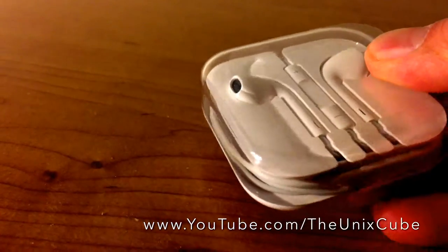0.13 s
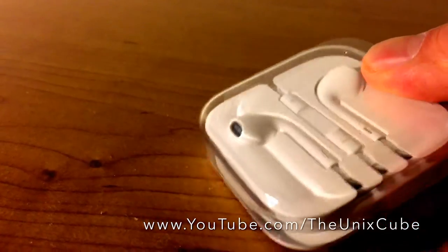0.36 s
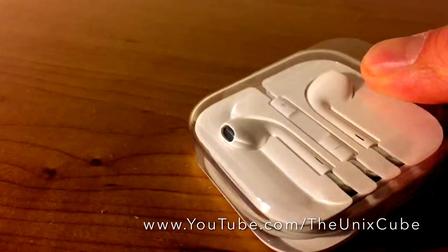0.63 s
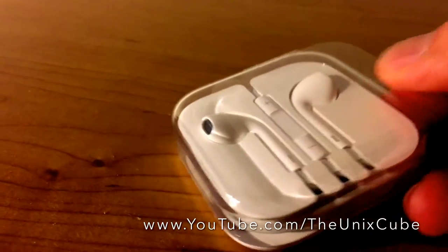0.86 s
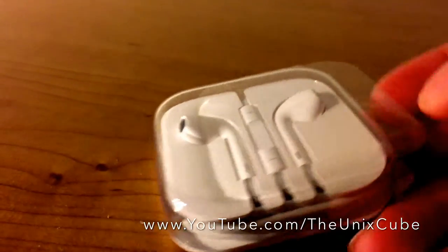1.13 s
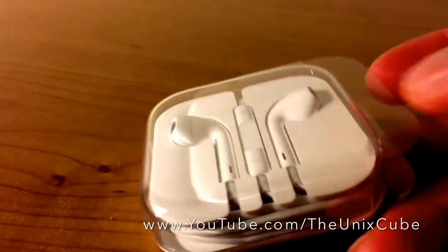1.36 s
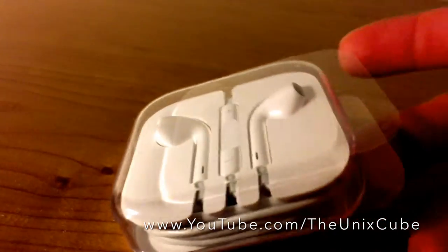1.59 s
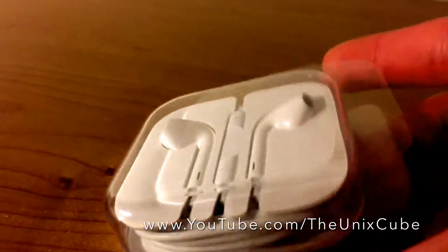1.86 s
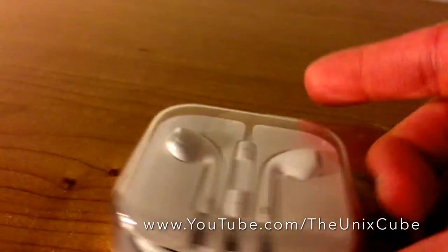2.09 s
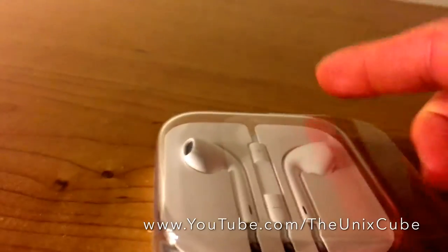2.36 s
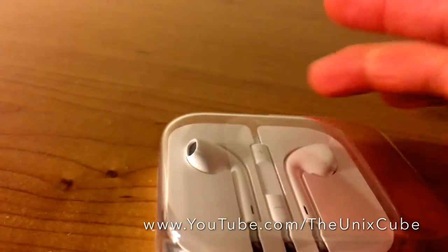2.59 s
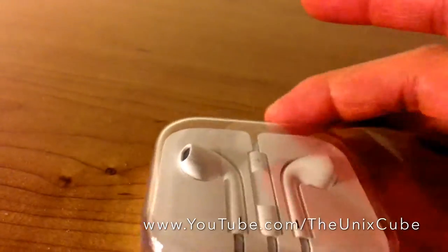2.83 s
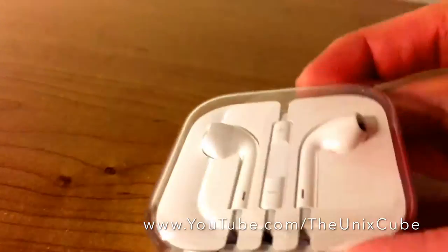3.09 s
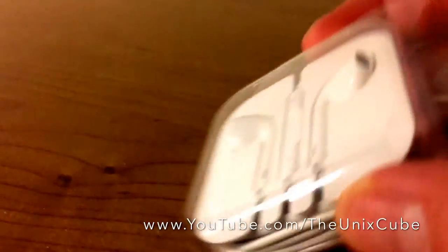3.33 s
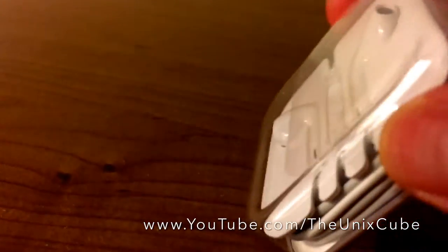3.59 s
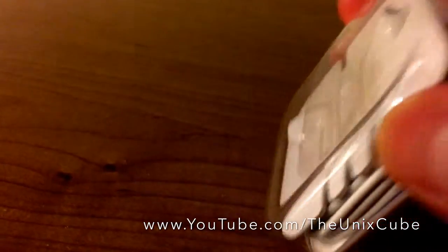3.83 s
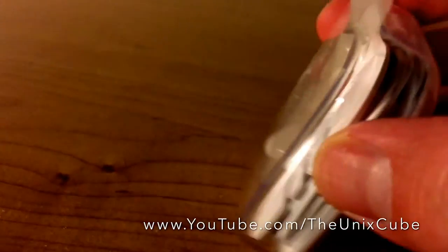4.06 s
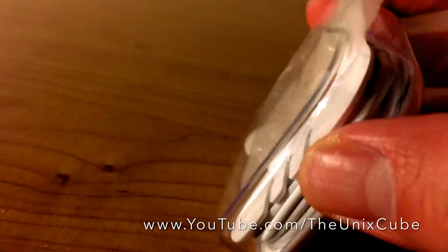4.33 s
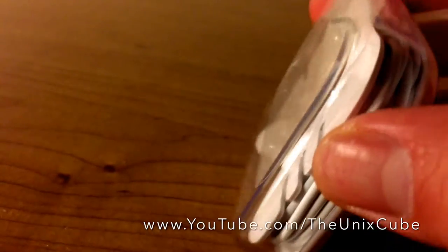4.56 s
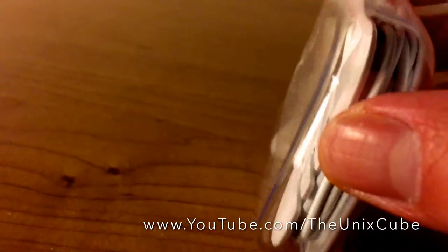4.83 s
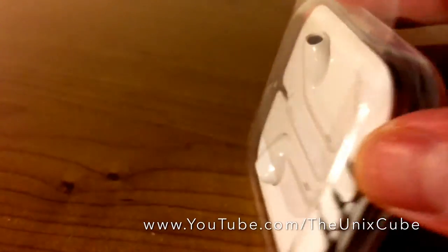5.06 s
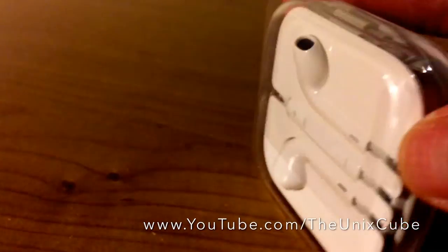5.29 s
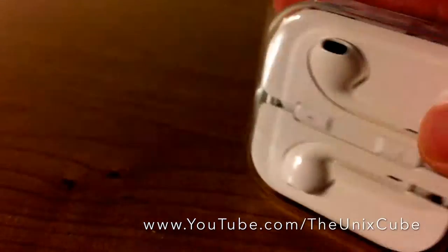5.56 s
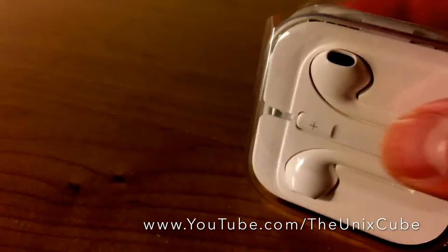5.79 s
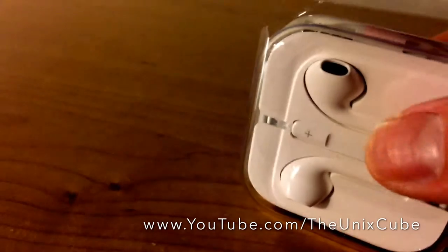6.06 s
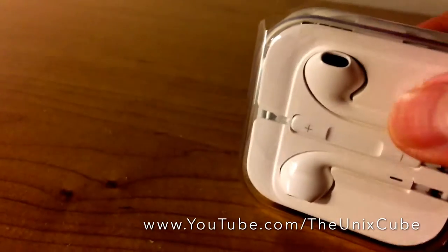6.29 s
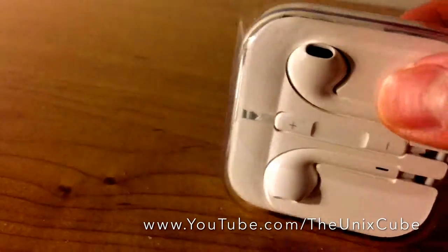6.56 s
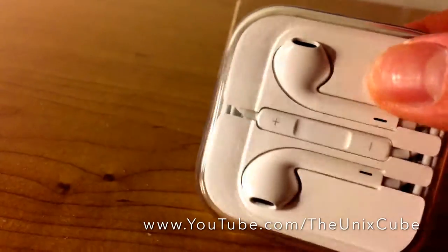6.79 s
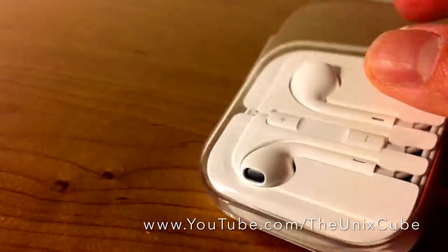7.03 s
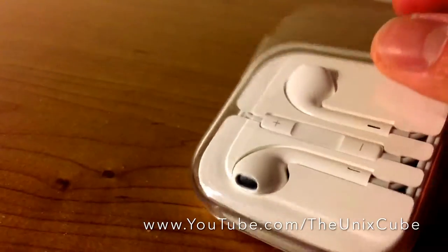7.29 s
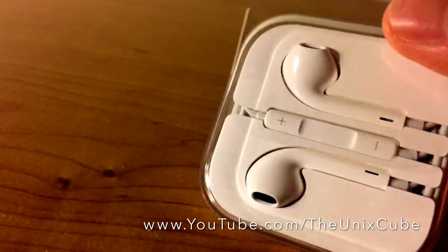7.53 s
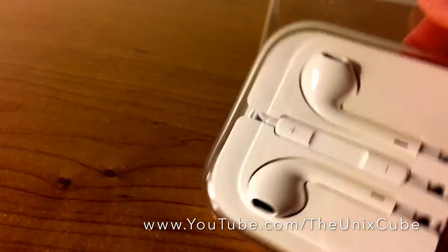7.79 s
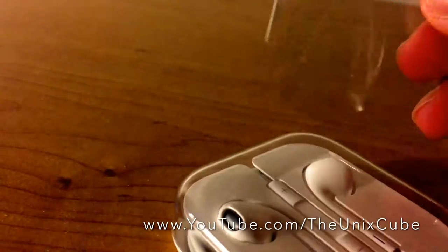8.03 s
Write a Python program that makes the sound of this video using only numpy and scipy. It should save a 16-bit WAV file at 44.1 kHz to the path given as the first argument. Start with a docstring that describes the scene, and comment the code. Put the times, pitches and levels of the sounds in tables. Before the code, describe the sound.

Close to a small microphone in a small quiet room, a hard plastic case is turned and tapped over a wooden table. A sharp knock comes early, then soft rubs, then strong isolated clacks around two, four and five seconds. Light ticks and shuffling follow, and a loud clack ends it. Faint low hum and hiss lie underneath.

```python
"""A hard plastic case is turned, tapped, set down and pried at on a wooden table, close to a small microphone.
Each contact is a noise crack plus damped shell, lid and table modes; a small room answers the knocks.
Fingers and a thin film slide, a fingernail scrapes and the case drags: noise that slips unevenly,
through spectra and resonances. A low hum and hiss, both shaped noise, waver slightly underneath."""
import sys
import numpy as np
from scipy import signal
from scipy.fft import rfft, irfft, next_fast_len
from scipy.io import wavfile
from scipy.ndimage import map_coordinates

SR = 44100
rng = np.random.default_rng(int(sys.argv[2]) if len(sys.argv) > 2 else 0)


def magnitude_from_level(level_db):
    """Linear magnitude for a level in decibels (20 dB per decade)."""
    exponent = np.asarray(level_db, float) / 20
    return 10 ** exponent


def transcribe(u):
    """Save the signal u as a 16-bit wav file named by the first command-line argument.

    u: samples, shape (n,) or (channels, n), limited to [-1, 1]; the rate is SR.
    q: integer samples, one column per channel.
    """
    v = np.clip(np.atleast_2d(u).T, -1, 1)
    q = np.round(v * 32767).astype(np.int16)
    wavfile.write(sys.argv[1], SR, q)


N = 359415


def unit(x):
    """Scales to rms 1."""
    return x / np.sqrt(np.mean(x ** 2) + 1e-20)


def along(points, hz):
    """Interpolates (f/Hz, value) points on a log frequency axis."""
    f, v = np.transpose(points)
    return np.interp(np.log(hz + 1), np.log(f + 1), v)


def filtered(x, response):
    """Multiplies the spectrum of x by a response of frequency."""
    m = next_fast_len(len(x) + 8192)
    hz = np.fft.rfftfreq(m, 1 / SR)
    return irfft(rfft(x, m) * response(hz), m)[:len(x)]


def coloured(x, spectrum):
    """Filters x by an (f/Hz, level/dB) spectrum."""
    return filtered(x, lambda hz: magnitude_from_level(along(spectrum, hz)))


def resonant(x, peaks):
    """Passes x twice through parallel resonances of alternating sign, for steep flanks."""
    def response(f):
        total = 0
        for k, (centre, width, db) in enumerate(peaks):
            damping = 1j * f * width
            total = total + (-1) ** k * magnitude_from_level(db) * damping / (centre ** 2 - f ** 2 + damping)
        return total ** 2
    return filtered(x, response)


def wobble(rate_hz):
    """Smooth random curve, rate_hz knots a second."""
    knots = rng.standard_normal(int(N * rate_hz / SR) + 4)
    return map_coordinates(knots, [np.arange(N) * rate_hz / SR])


def gritty(grit_db, slips_hz):
    """Noise whose strength varies unevenly as the skin sticks and slips."""
    return unit(rng.standard_normal(N) * magnitude_from_level(grit_db * wobble(slips_hz)))


def strokes(rows):
    """Strength of the strokes and of what each shakes besides: quick catch, even drift in dB, quick lift."""
    catch_db_per_s, lift_db_per_s = 899.5, 798.5
    t = np.arange(0, N / SR + .002, .001)
    start, length, first_db, last_db, other_db = np.transpose(rows)[:, :, None]
    drift_db = first_db + (last_db - first_db) * np.clip((t - start) / length, 0, 1)
    catch_db = catch_db_per_s * np.maximum(start - t, 0)
    lift_db = lift_db_per_s * np.maximum(t - start - length, 0)
    power = magnitude_from_level(2 * (drift_db - catch_db - lift_db))
    time = np.arange(N) / SR
    main = np.interp(time, t, np.sqrt(np.sum(power, axis=0)))
    other = np.interp(time, t, np.sqrt(np.sum(power * magnitude_from_level(2 * other_db), axis=0)))
    return main, other


# hum and hiss spectrum: f/Hz, relative density/dB
HUM_HISS_SPECTRUM = [(13, -53), (22, -25.5), (53, -0.5), (144, -9), (195, -21), (265, -13), (436, -23.5),
                     (660, -23), (757, -23.5), (2350, -30.5), (13800, -38), (16300, -40.5)]


def background():
    """Low hum and hiss as one shaped noise, its level wavering a little."""
    level_db = -66 + 0.52 * wobble(rate_hz=0.87)
    return magnitude_from_level(level_db) * unit(coloured(rng.standard_normal(N), HUM_HISS_SPECTRUM))


# skin and film on the shell: start t/s, length t/s, hiss level at start/dB, at end/dB, rim level re hiss/dB
SLIDE_STROKES = [(.4, 0.093, -76.5, -70, -2), (.525, 0.012, -64, -54, -17), (.715, 0.029, -66, -61, -14),
                 (.85, 0.135, -75, -71, -13), (1.17, 0.11, -76, -73, -4), (1.965, 0.059, -67, -48.5, -5),
                 (2.03, 0.36, -66.5, -64, -11), (2.31, 0.056, -64.5, -56.5, -4.5),
                 (2.38, 0.062, -64.5, -68, -12), (2.47, 0.073, -73.5, -68, 0), (2.6, 0.046, -64, -56, 1),
                 (2.66, 0.059, -68, -78.5, -2.5), (2.8, .07, -73, -68.5, -2), (3., 0.18, -71.5, -73.5, -3),
                 (3.31, 0.041, -76, -72, 1.5), (3.64, 0.063, -77.5, -73.5, -7),
                 (3.81, 0.026, -80.5, -78.5, -6), (3.985, 0.013, -52, -56.5, 5.5), (4., 0.35, -69, -66, -5),
                 (4.14, 0.058, -68, -63.5, 11.5), (5.27, 0.038, -69.5, -50, -2.5),
                 (5.42, 0.083, -81, -69, -3.5), (5.52, 0.283, -65.5, -69, -2), (6.42, .05, -77.5, -75, -3),
                 (6.57, 0.11, -77, -49, -10.5), (6.71, 0.12, -80, -75.5, 4), (7.08, 0.033, -78, -80, -5),
                 (7.31, 0.0089, -71, -71.5, -19), (7.55, 0.045, -69, -60.5, -1),
                 (7.62, 0.062, -76.5, -64.5, 1), (7.72, .12, -74, -71.5, 0), (7.85, 0.15, -66, -52, 3),
                 (8.03, .12, -39.5, -67, 5.5)]
# hiss spectrum: f/Hz, relative density/dB
SKIN_SPECTRUM = [(1180, -26), (2000, -1), (2960, -7.5), (3550, -1.5), (4010, -5), (8050, -7), (10800, -8.5),
                 (14500, -8.5), (16000, -25)]


def sliding():
    """Skin and film slip over the shell as gritty hiss; also returns how hard they shake the rim."""
    hiss, rim = strokes(SLIDE_STROKES)
    return hiss * unit(coloured(gritty(grit_db=1.5, slips_hz=150), SKIN_SPECTRUM)), rim


# how freely the fingers let the lid ring: t/s, lid level re table/dB (before knock trims)
LID_FREEDOM = [(0, -3), (.7, 2.5), (1.3, 8), (1.6, 2), (2., 3), (2.35, -12), (3., 3.5), (3.4, -4.5),
               (3.95, 3.5), (4.3, -6), (5.06, 4.5), (5.3, -7), (5.5, -1), (5.65, -12.5), (6.7, -9.5),
               (7.5, -14.5), (7.72, 1.5), (7.9, -6.5), (8.15, 4.5)]


def lid_db(s):
    """Lid level re table at time s, as the grip changes."""
    return np.interp(s, *np.transpose(LID_FREEDOM))


# case dragging and rocking: start t/s, length t/s, shell level at start/dB, at end/dB, table level re shell/dB
DRAG_STROKES = [(.44, 0.027, -76, -71, -11), (.51, 0.025, -69, -66, 9.5), (.73, 0.058, -74, -52.5, -1),
                (.82, 0.051, -66, -77, 5.5), (.91, 0.062, -75, -72.5, 1), (1.03, 0.076, -85, -77.5, 4),
                (1.17, .05, -68, -79, -5), (1.225, 0.079, -59, -60.5, -3.5), (1.46, .1, -78.5, -65, 6),
                (1.965, 0.048, -70, -35, -2.5), (2.03, .12, -52.5, -80.5, 16.5),
                (2.15, 0.29, -65, -77.5, 5), (2.32, 0.064, -71.5, -68.5, 10),
                (2.5, 0.044, -69.5, -66, -11.5), (2.6, 0.048, -62, -56, -1.5),
                (2.82, 0.061, -76.5, -69, -2.2), (3.02, .12, -72, -70.5, 3.5), (3.31, 0.046, -69, -66.5, 3),
                (3.66, 0.044, -78.5, -75, -2), (3.79, 0.04, -73, -72, -11.5),
                (3.93, .014, -52.5, -40.5, -4.5), (3.97, 0.13, -55, -71, 11.5), (4.1, 0.08, -62, -54, 3.2),
                (4.2, 0.18, -75.5, -73, 9), (5.08, 0.12, -46, -75.5, 8.5), (5.22, .1, -63.5, -55.5, -5),
                (5.32, 0.037, -48.5, -60.5, 7.5), (5.42, 0.078, -72, -67.5, 5.5),
                (5.52, 0.046, -53.5, -62, 7.5), (5.58, 0.19, -56, -60, -1.5), (5.75, 0.055, -60, -63, 3.5),
                (6.33, 0.062, -74.5, -63.5, -1), (6.43, 0.12, -62, -64, -2.5), (6.57, 0.14, -62, -41, -8),
                (6.71, 0.058, -51.5, -60.5, 9.5), (6.78, 0.0383, -65.5, -53.5, -3),
                (6.93, 0.034, -82, -74.5, 11.5), (7.05, .07, -74.5, -70.5, -6),
                (7.38, 0.09, -76.5, -72.5, 9.5), (7.56, .04, -71, -63.5, -7.5),
                (7.6, 0.016, -74.5, -78.5, 14.5), (7.67, .035, -81, -72.5, 11.5),
                (7.72, 0.11, -60, -82.5, 11.5), (7.85, 0.079, -67, -46.5, 7.5),
                (7.93, 0.065, -52.5, -35.5, -1.5), (8.03, .12, -26, -57.5, -2.2)]
# rubbed shell, its air cavity: f/Hz, width per pass/Hz, level per pass/dB
CAVITY_PEAKS = [(1010, 180, -.5)]
# rubbed rim: f/Hz, width per pass/Hz, level per pass/dB
RIM_PEAKS = [(1500, 310, 2.5), (2040, 260, -5.5)]
# rubbed table: f/Hz, width per pass/Hz, level per pass/dB
WOOD_PEAKS = [(144, 150, -3.5), (263, 410, -3), (384, 110, -3)]


def dragging(rubbed_rim):
    """One stick-slip force drives shell, rim and lid; separate, slower slips drive the table."""
    shell, table = strokes(DRAG_STROKES)
    rim = np.hypot(rubbed_rim, magnitude_from_level(-11.5) * shell)  # a drag shakes the rim too
    lid = table * magnitude_from_level(lid_db(np.arange(N) / SR))
    slips = gritty(grit_db=2.5, slips_hz=120)
    table_slips = gritty(grit_db=2.0, slips_hz=57)
    return (shell * unit(resonant(slips, CAVITY_PEAKS))
            + rim * unit(resonant(slips, RIM_PEAKS))
            + lid * unit(resonant(slips, [(564, 87, 0)]))
            + table * unit(resonant(table_slips, WOOD_PEAKS)))


def rings(t, modes, chance, attack_s):
    """Damped modes that swell over the contact time, each at a slightly new strength."""
    total = 0
    for (hz, db, t60), c in zip(modes, chance):
        total = total + magnitude_from_level(db + 1.5 * c - 60 * t / t60) * np.sin(2 * np.pi * hz * t)
    return (1 - np.exp(-t / attack_s)) ** 2 * total


# contacts, before trims: t/s, shell level/dB, table level re shell/dB, crack level re shell/dB, shell pitch f/Hz
CONTACTS = [(0.5094, -27.5, -11, -11, 962), (0.698, -68, -9, 17, 1000), (0.741, -43, -19, 8, 1270),
            (0.761, -38.5, -4.5, -12, 1020), (0.774, -39, -2.5, -6, 1010), (0.795, -45.5, 0, -12, 984),
            (0.845, -53, -1, -10, 920), (1.045, -56, -4, -6, 970), (1.221, -44, 2, -11, 1010),
            (1.237, -36.5, -4, -11, 900), (1.253, -44.5, -5.5, -23, 960), (1.272, -39, -13, -8, 1010),
            (1.973, -42.5, -7, 2, 1460), (2.0146, -5, -5.5, -2.5, 838), (2.0209, -14.5, -22, -14, 980),
            (2.032, -36, -6.5, -14.5, 1030), (2.601, -42, 0, -2.5, 1500), (2.637, -38, -13, -8.5, 1494),
            (2.779, -61, -6, 9.5, 985), (2.873, -42, -14, 5.5, 1500), (3.023, -44.5, -10.5, -24.5, 858),
            (3.05, -47, -2, -13, 930), (3.3, -56, 5.5, -7, 874), (3.603, -56.5, -14.5, -13.5, 990),
            (3.808, -54.5, -13, -3.5, 988), (3.917, -27.5, -26, -20, 993), (3.9455, -2, -7.5, -1.5, 903),
            (3.953, -6.5, -6.5, -9, 810), (3.958, -13.5, -17, -12, 960), (3.993, -19.5, -2.5, -21, 995),
            (4.145, -41, -10.5, -21, 1000), (4.158, -36, -4.5, -15, 1000), (4.177, -34, 2, -11, 1020),
            (4.197, -25.5, -16.5, -25, 1010), (4.369, -45.5, -9.5, -18, 1370),
            (4.405, -25.5, -21.5, -20.5, 1018), (4.424, -39.5, 4, -16.5, 1016), (4.479, -60, -6, -14, 1300),
            (4.688, -43.5, -25, -27.5, 1000), (4.783, -40.5, -20, -24.5, 1010),
            (4.871, -45.5, -22.5, 4.5, 1010), (4.881, -50.5, -34, -8.5, 1010),
            (4.894, -31, -27.5, -23, 1010), (5.056, -11, -5, -1.5, 978), (5.0754, -15, -11.5, -12, 976),
            (5.143, -33, -11.5, -16, 910), (5.323, -27.5, -2.5, -3.5, 996), (5.334, -29, -15, -30, 1050),
            (5.447, -37, -19, -13, 950), (5.485, -28, 1, -16, 1014), (5.499, -32.5, -6, -12, 910),
            (5.524, -27, -14.5, -10.5, 1060), (5.793, -38.5, -5.5, -16, 1117), (6.456, -51.5, 3, -11, 1088),
            (6.48, -49, -10, -14.5, 1010), (6.528, -47.5, -19.5, -9, 980), (6.635, -42, -9.5, 4, 1240),
            (6.645, -41, -22, -6, 1030), (6.677, -29.5, -13, -5, 970), (6.694, -33, -4, -1, 990),
            (6.722, -30.5, -4.5, -17, 1010), (6.753, -44, 5, -20, 1040), (6.781, -60, -9, 13, 1000),
            (6.811, -35.5, -12, -13, 995), (7.552, -56.5, -7, 3, 1054), (7.585, -39, -2.5, 12.5, 885),
            (7.592, -40, -15, 4, 1440), (7.647, -56, -7, 13, 1500), (7.71, -25.5, -4.5, -9.5, 902),
            (7.873, -49, 13, -9, 1210), (7.886, -38, 6.5, -2.5, 830), (7.913, -32.5, 3.5, -14, 930),
            (7.933, -43.5, -3, 10.5, 1010), (7.963, -28.5, 1.5, -23, 1030), (7.987, -28.5, -1, 5, 1010),
            (8.013, -2.5, -14.5, 0, 1182), (8.0168, -6, -6, -3.5, 1340)]
# shell modes: multiple of shell pitch, level/dB, t60/s at a pitch of 1000 Hz
SHELL_MODES = [(1, 4, 0.016), (1.22, -14, 0.027), (1.55, -2.5, 0.0093), (1.95, -9.5, .012),
               (2.401, -24.5, 0.012), (3.4, -25, .018), (4.5, -31.5, 0.0074), (5.4, -31, 0.011)]
# broad lid modes: f/Hz, level/dB, t60/s
LID_MODES = [(491, 0, 0.028), (633, 2, 0.033)]
# table modes: f/Hz, level/dB, t60/s
TABLE_MODES = [(55, -12.5, 0.011), (111.6, -15.5, 0.13), (240, 1, 0.045), (405.6, 3, 0.041)]
# whole table top, jolted by every blow: f/Hz, level re shell/dB, t60/s
JOLT_MODE = [(78, -27.5, .12)]
# crack spectrum: f/Hz, relative density/dB
CRACK_SPECTRUM = [(1470, -37.5), (2500, -5.5), (2810, -8), (5030, -3.5), (7360, -14), (9510, -11),
                  (10400, -14.5), (12500, -15), (16000, -21)]


def knocks():
    """Each contact cracks as a noise burst, then rings the shell, the lid and the table."""
    body_trim_db, lid_trim_db, table_trim_db, crack_trim_db = 2.5, 0.5, -2.0, -5.5
    t = np.arange(SR // 8) / SR
    body, cracks = np.zeros(N + len(t)), np.zeros(N + len(t))
    scatter = rng.standard_normal((len(CONTACTS), 3, len(SHELL_MODES)))
    snap = magnitude_from_level(-60 * t / 0.0068)
    rattle = magnitude_from_level(-18 - 60 * t / 0.026)  # the edges
    splinter = (1 - np.exp(-t / 0.00039)) * (snap + rattle)
    for (s, db, table_db, crack_db, hz), chance in zip(CONTACTS, scatter):
        # a tighter grip rings higher and shorter
        shell_modes = np.multiply(SHELL_MODES, [hz, 1, (1000 / hz) ** 0.47])
        shell = rings(t, shell_modes, chance[0], attack_s=0.00043)
        lid = magnitude_from_level(table_db + lid_db(s) + lid_trim_db) * rings(t, LID_MODES, chance[1], attack_s=0.0011)
        thump = magnitude_from_level(table_db + table_trim_db) * rings(t, TABLE_MODES, chance[2], attack_s=0.0015)
        jolt = rings(t, JOLT_MODE, chance[2, -1:], attack_s=0.00078)
        start = round(s * SR)
        span = slice(start, start + len(t))
        body[span] += magnitude_from_level(db + body_trim_db) * (shell + lid + thump + jolt)
        cracks[span] += magnitude_from_level(db + crack_db + crack_trim_db) * splinter
    crack_noise = unit(coloured(rng.standard_normal(N), CRACK_SPECTRUM))
    return body[:N] + cracks[:N] * crack_noise


# room decay: f/Hz, t60/s
ROOM_DECAY = [(100, .3), (500, .27), (2000, 0.22), (6000, 0.077), (14000, 0.047)]
# room tail at its onset: f/Hz, relative level/dB
ROOM_ONSET = [(100, -12.5), (300, -1.5), (700, -5.5), (2000, -0.5), (6000, -4.5), (14000, 2)]


def room(x):
    """Noise tail in which each frequency dies at its own speed; a fresh tail every quarter second."""
    delay, size = 130, SR // 4  # samples
    wet = np.zeros(N + SR)
    for start in range(0, N, size):
        hz, t, z = signal.stft(rng.standard_normal(SR // 2), SR, nperseg=256)
        decay_db = along(ROOM_ONSET, hz)[:, None] - 60 * t / along(ROOM_DECAY, hz)[:, None]
        tail = signal.istft(z * magnitude_from_level(decay_db), SR, nperseg=256)[1]
        answer = signal.fftconvolve(x[start:start + size], tail / np.linalg.norm(tail))
        wet[start + delay:start + delay + len(answer)] += answer
    return wet[:N]


# nail scrapes: start t/s, length t/s, level at start/dB, at end/dB, rim level re scrape/dB
NAIL_STROKES = [(.528, 0.0099, -67, -45.5, -22), (.715, 0.024, -61, -62, -20), (.85, 0.018, -71, -69, -12),
                (.915, 0.016, -72, -72, -15), (.965, 0.017, -72, -69, -12), (1.32, .02, -78, -75, -12),
                (2.32, 0.052, -65.5, -54.5, -7.5), (6.665, 0.02, -55, -56, -19),
                (7.57, .025, -70.5, -62.5, -3.5)]
# fingernail edge on the shell: f/Hz, width per pass/Hz, level per pass/dB
NAIL_PEAKS = [(3900, 1400, 3.5), (6260, 1650, 1)]


def scraping():
    """A fingernail's edge scrapes in coarse, fast slips; also returns how hard it shakes the rim."""
    nail, rim = strokes(NAIL_STROKES)
    return nail * unit(resonant(gritty(grit_db=5, slips_hz=230), NAIL_PEAKS)), rim


# microphone response: f/Hz, level/dB
MIC_RESPONSE = [(30, -7), (90, 0.25), (160, -1.8), (9000, 0.94), (10500, -1.5), (12000, 0.54),
                (15600, -1.9), (16400, -14.5), (17000, -49)]


def scene():
    """Case, table and room through the microphone response, hum and hiss added after it."""
    film, film_rim = sliding()
    scrape, scrape_rim = scraping()
    rubbing = film + scrape + dragging(film_rim + scrape_rim)
    hits = knocks()
    heard = coloured(hits + magnitude_from_level(-16) * room(hits) + rubbing, MIC_RESPONSE)
    return (heard + background())[None]


def band_limit(x):
    """A steep low-pass at the top of the band."""
    return signal.sosfilt(signal.butter(12, 17000, fs=SR, output="sos"), x)


def record(dry):
    """Soft limiting: the loudest knocks press against a ceiling of 1.05."""
    soft = dry / (1 + np.abs(dry / 1.05) ** 6) ** (1 / 6)
    return band_limit(soft)


dry = scene()
out = record(dry)
transcribe(out)
```